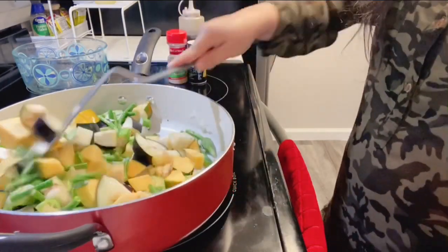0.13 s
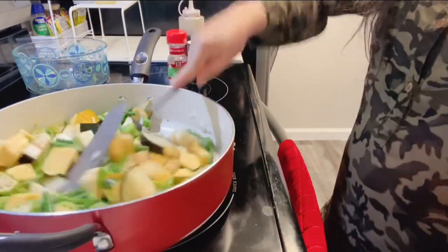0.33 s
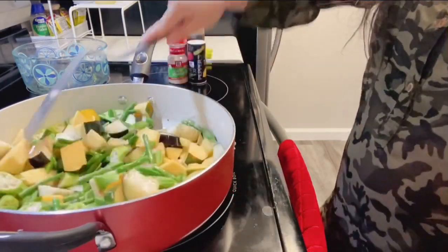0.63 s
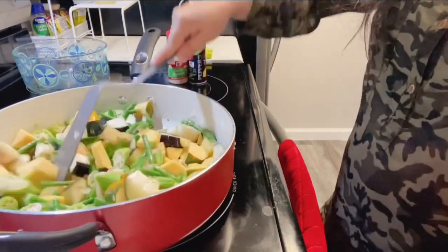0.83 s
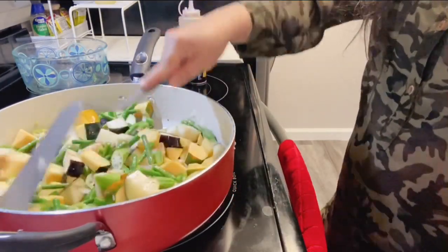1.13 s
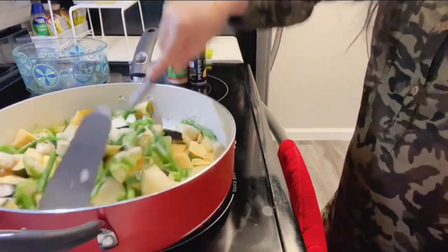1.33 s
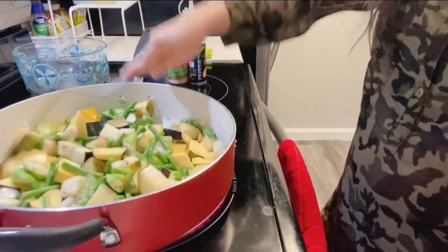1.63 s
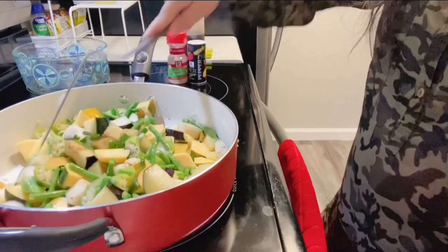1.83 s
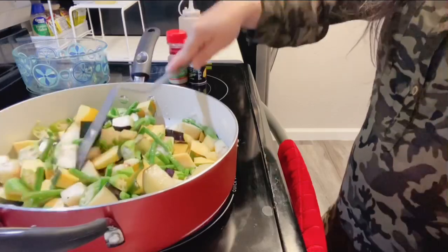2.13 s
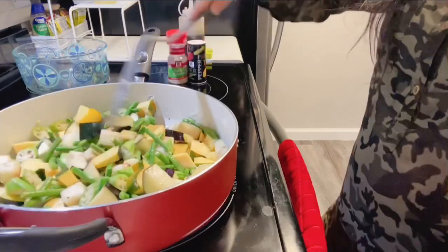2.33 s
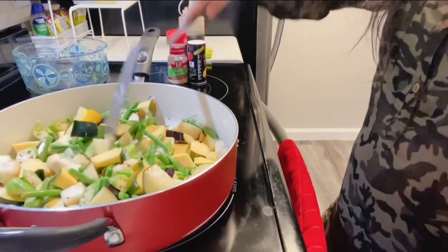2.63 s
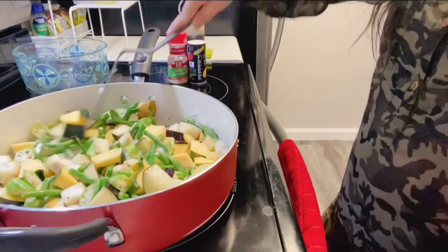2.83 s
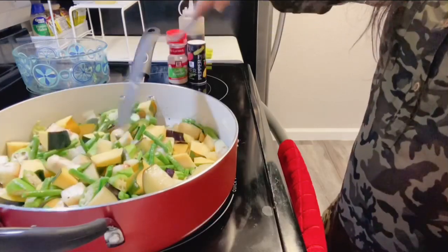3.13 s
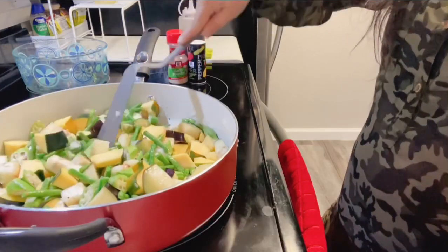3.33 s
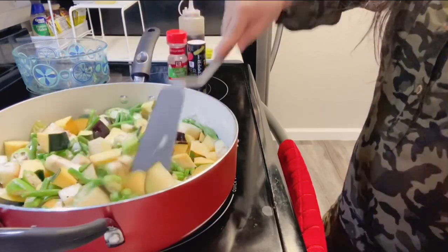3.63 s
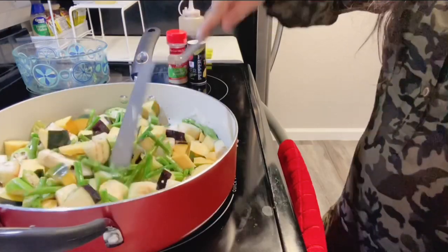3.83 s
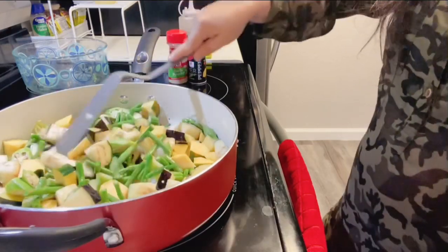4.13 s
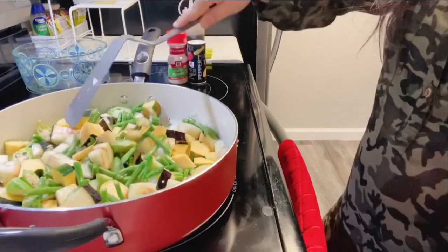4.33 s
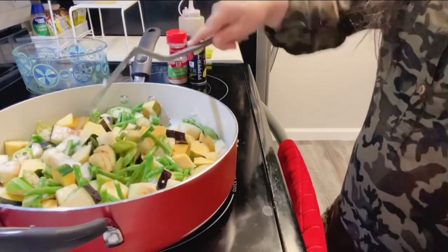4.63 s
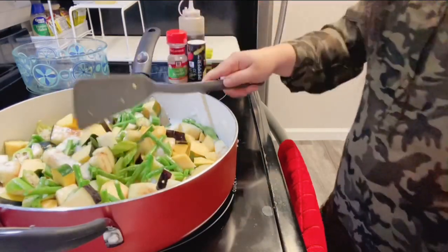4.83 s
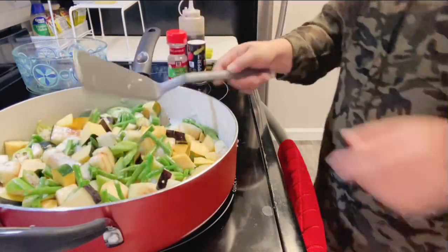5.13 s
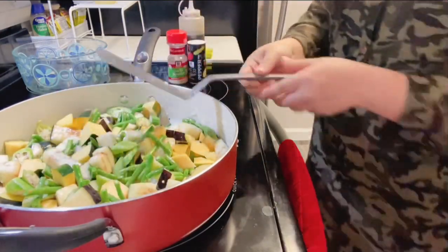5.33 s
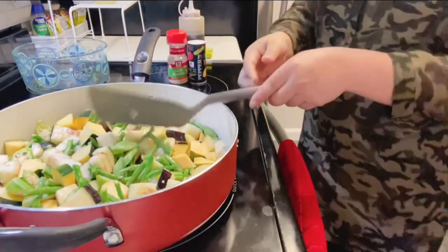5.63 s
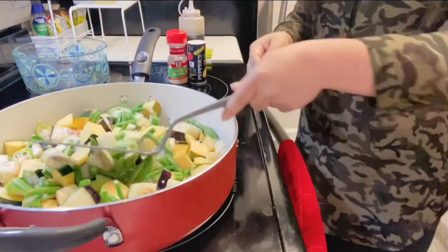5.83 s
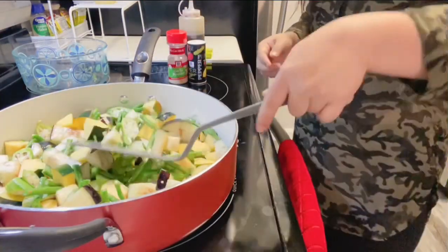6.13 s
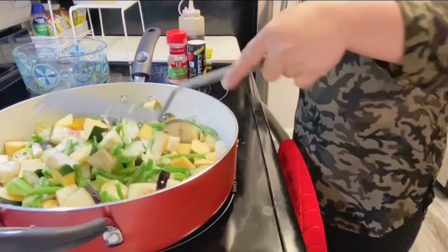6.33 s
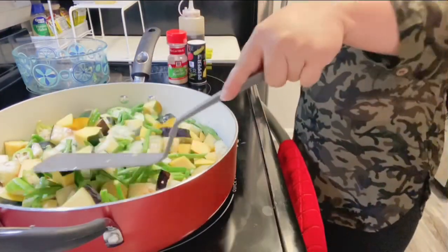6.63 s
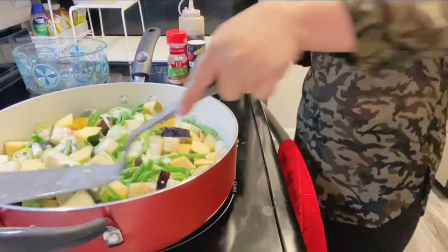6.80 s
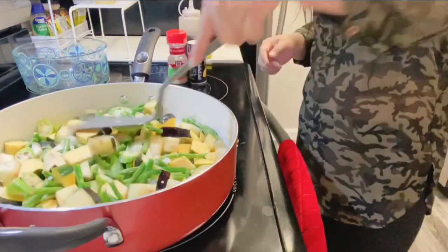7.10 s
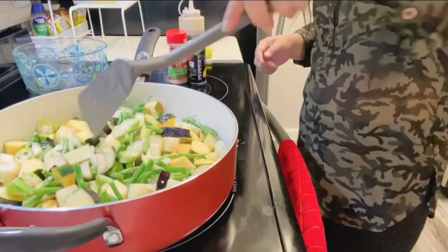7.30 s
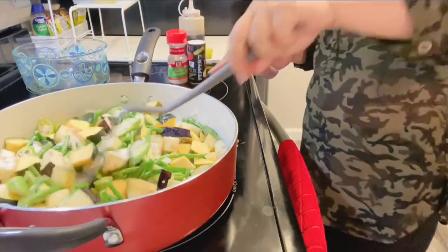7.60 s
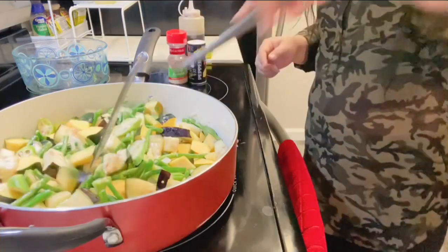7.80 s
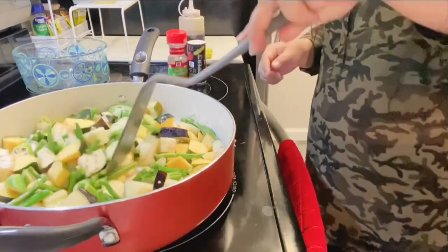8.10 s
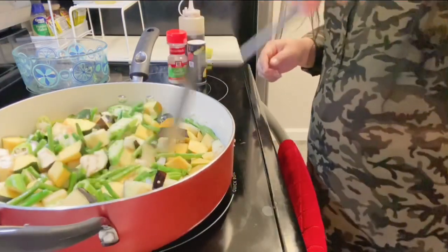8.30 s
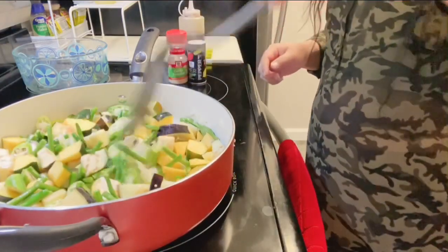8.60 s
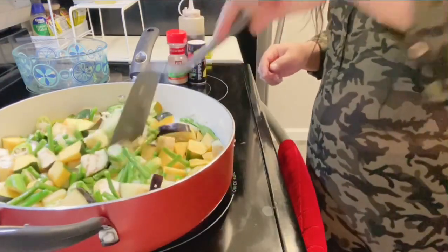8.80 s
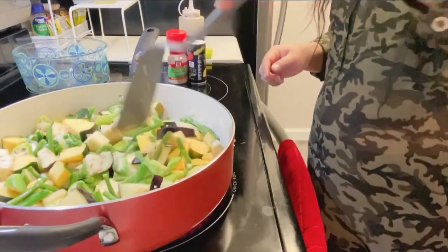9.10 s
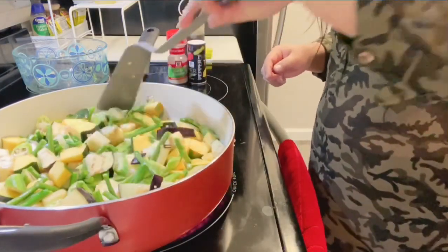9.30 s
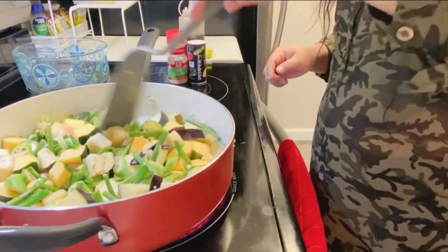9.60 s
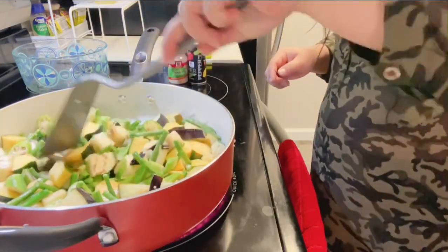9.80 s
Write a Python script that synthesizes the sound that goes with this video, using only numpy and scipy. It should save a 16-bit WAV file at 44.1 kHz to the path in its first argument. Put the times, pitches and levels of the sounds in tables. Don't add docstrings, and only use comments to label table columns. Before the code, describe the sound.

Throughout the ten seconds, oil sizzles with a dense, bright crackle and airy fizz over a low, wavering cooker-hood rumble, while vegetables turn with a soft muffled rustle. A brief hard scrape comes at 0.4 seconds, then knocks and a click around 0.8. Light drops and taps follow, with a duller knock at 1.7. A cluster of thuds and a sharp click lands at 2.8 to 3.0 seconds. A tap at 3.7 and a knock at 4.1 lead to two firm clacks with scrapes at 4.85 and 5.0, another click at 5.6, then a quieter stretch. Strong knocks return at 7.0, a long soft sweep at 7.3, and a crisp clack at 7.65. The sizzle lifts near 8.2; a hard scrape with taps comes at 8.5, food drops at 8.9, spits snap around 9.0 to 9.4, and a click sounds at 9.8. Close stereo, small kitchen, short echo.

```python
import sys
import numpy as np
from scipy import signal
from scipy.fft import rfft, irfft, next_fast_len
from scipy.io import wavfile

SR = 44100
rng = np.random.default_rng(int(sys.argv[2]) if len(sys.argv) > 2 else 0)


def nominal_scale(level):
    x = np.asarray(level, float) / 20
    return 10 ** x


def put_to_file(sound):
    columns = np.atleast_2d(sound).T
    safe = np.clip(columns, -1, 1)
    whole_steps = np.round(safe * 32767)
    wavfile.write(sys.argv[1], SR, whole_steps.astype(np.int16))


N = 438794


def rms_one(x):
    return x / np.sqrt(np.mean(x ** 2) + 1e-20)


def at_hz(points, hz):
    points = np.array(points)
    return np.interp(np.log(hz), np.log(points[:, 0]), points[:, 1])


def drift(rate_hz):
    r = np.exp(-80 * np.pi * rate_hz / SR)
    noise = rng.standard_normal(N // 40 + 2002)
    slow = signal.lfilter([1], [1, -2 * r, r * r], noise)[2000:]
    return np.interp(np.arange(N) / 40, np.arange(len(slow)), rms_one(slow))


def grains(per_s, spread_db, bed):
    size_db = spread_db * np.minimum(rng.exponential(1, (2, N)), 6)
    sizes = nominal_scale(size_db) * rng.choice([-1, 1], (2, N))
    clicks = sizes * (rng.random((2, N)) < per_s / SR)
    return rms_one(clicks) + bed * rng.standard_normal((2, N))


def coloured(source, spectrum, patchy_db, shared_db):
    size = next_fast_len(N)
    hz = np.maximum(np.fft.rfftfreq(size, 1 / SR), 1)
    shaped = rfft(source, size) * nominal_scale(at_hz(spectrum, hz))
    low_hz, high_hz = spectrum[0][0], spectrum[-1][0]
    step = 4 / 3 * np.log2(np.clip(hz, low_hz, high_hz) / low_hz)
    out = 0
    for k in range(int(step.max()) + 2):
        weight = np.maximum(1 - np.abs(step - k), 0)
        band = irfft(shaped * weight, size)[:, :N]
        out = out + nominal_scale(patchy_db * drift(20.7)) * band
    return rms_one(out * nominal_scale(shared_db * drift(12)))


# (time [s], oil vigour [dB], stirring effort [dB])
VIGOUR = [(0.0, -45, -46), (0.33, -41.5, -45), (0.55, -46.5, -49), (1.08, -47, -44.5), (1.3, -44, -45.5),
          (1.55, -47, -47.5), (2.22, -49, -45.5), (2.77, -45.5, -49), (4.13, -45, -46), (4.79, -46, -45.5),
          (5.04, -45.5, -43.5), (6.01, -44, -43.5), (6.2, -44, -44.5), (7.98, -45.5, -43),
          (8.23, -41.5, -48), (8.81, -43.5, -43.5), (9.15, -41.5, -43.5), (9.95, -42, -43.5)]


def vigour():
    s, *controls = np.transpose(VIGOUR)
    t = np.arange(N) / SR
    return [np.interp(t, s, c - c.mean()) for c in controls]


# (frequency [Hz], density [dB per Hz])
SIZZLE = [(1000, -4), (2200, 3), (3600, -2.5), (4500, 2.5), (6000, 3.5), (8000, -1), (9500, -4.5),
          (11000, -3), (16000, -63)]


def sizzle(oil_db):
    return nominal_scale(-43.5 + oil_db) * coloured(grains(4000, 3.4, 0.84), SIZZLE, patchy_db=2.3, shared_db=1.0)


# (frequency [Hz], density [dB per Hz])
FIZZ = [(4500, -89), (8000, 13.5), (10000, -12), (11500, 7), (13000, -9), (14500, 3.5), (16000, -3.5),
        (19000, 5)]


def fizz(oil_db):
    level_db = -49.5 + 1.1 * oil_db + 1.2 * drift(1.6)
    return nominal_scale(level_db) * coloured(grains(3700, 2.8, 1.8), FIZZ, patchy_db=2.5, shared_db=3.0)


# (middle [s], length [s], level change [dB])
SLIDES = [
    (0.36, 0.038, 5),
    (0.81, .05, 5),
    (3.02, .08, 3.5),
    (4.886, 0.081, 3),
    (5.058, 0.081, 2),
    (7.326, 0.31, -2.5),
    (7.997, 0.071, 0),
    (8.47, .09, 8.5),
    (9.4, .03, 4),
]


def slides_db():
    t = np.arange(N) / SR
    return sum(extra_db * np.exp(-(2 * (t - s) / length) ** 2) for s, length, extra_db in SLIDES)


# (frequency [Hz], density [dB per Hz])
SCRAPE = [(700, -55), (1300, -1), (1650, 0), (1800, 5.5), (2100, 1), (2800, 2), (3450, 2.5), (3900, -0.5),
          (7000, -17)]


def scrape(stir_db):
    level_db = -43.5 + stir_db + slides_db()
    return nominal_scale(level_db) * coloured(grains(2500, 3.2, 0.67), SCRAPE, patchy_db=2.0, shared_db=1.04)


# (frequency [Hz], density [dB per Hz])
TUMBLE = [(200, -18), (400, 1), (620, 9.5), (720, 5.5), (1100, 6), (1500, -5), (2500, -2)]


def tumble(stir_db):
    level_db = -43 + 0.36 * stir_db
    return nominal_scale(level_db) * coloured(grains(300, 2.53, 0.96), TUMBLE, patchy_db=2.5, shared_db=0.44)


def frying():
    oil_db, stir_db = vigour()
    return sizzle(oil_db) + fizz(oil_db) + scrape(stir_db) + tumble(stir_db)


# (frequency [Hz], density [dB per Hz])
HOOD = [(15, -36), (25, -39), (59, -9), (75, -4.5), (119, -6.5), (174, -6.5), (211, -10.5), (295, -4),
        (354, -1), (487, -5.5), (537, -11.5), (700, -18), (910, -68), (1540, -120)]
# (frequency [Hz], width [Hz], level [dB])
HOOD_TONES = [(63.6, 17.4, -44.5), (117.2, 5, -45.5), (172.5, 4.7, -45), (214, 26, -50), (242.3, 13, -50.5)]


def hood():
    hz = np.maximum(np.fft.rfftfreq(N, 1 / SR), 1)
    rumble = irfft(rfft(rng.standard_normal((2, N))) * nominal_scale(at_hz(HOOD, hz)), N)
    out = nominal_scale(-37.5 - 6.5) * rms_one(rumble)
    for tone_hz, width_hz, level_db in HOOD_TONES:
        r = np.exp(-np.pi * width_hz / SR)
        poles = [1, -2 * r * np.cos(2 * np.pi * tone_hz / SR), r * r]
        tone = signal.lfilter([1, 0, -1], poles, rng.standard_normal((2, N)))
        out = out + nominal_scale(level_db) * rms_one(tone)
    return out


def struck(modes, gains, t, phases):
    hz, level_db, t60 = np.transpose(modes)[:, :, None]
    envelope = gains[:, None] * nominal_scale(level_db - 60 * t / t60)
    return np.sum(envelope * np.sin(2 * np.pi * hz * t + phases[..., None]), -2)


def puff(noise, low_hz, high_hz, t, t60):
    band = signal.butter(3, [low_hz, high_hz], "band", fs=SR, output="sos")
    burst = signal.sosfilt(band, noise * nominal_scale(-60 * t / t60))
    return burst / np.abs(burst).max()


def pair_noise(count, apart):
    shared, left, right = rng.standard_normal((3, count))
    return shared + apart * np.array([left, right])


def add(out, sound, s):
    i = round(s * SR)
    out[:, i:i + sound.shape[1]] += sound[:, :N - i]


def snaps(events):
    out, t = np.zeros((2, N)), np.arange(SR // 16) / SR
    for s, peak_db, hz, snap_db, top_db in events:
        noise = pair_noise(len(t), apart=0.16)
        body = 0.52 * struck([(hz, 0, .012)], np.ones(1), t, np.zeros(1))
        body = body + 0.26 * puff(noise, 1010, 3800, t, 0.031)
        snap = nominal_scale(snap_db + 2.5) * puff(noise, 3800, 8970, t, 0.014)
        spray = nominal_scale(top_db + 10.5) * puff(noise, 9300, 2 * 9300, t, .009)
        add(out, nominal_scale(peak_db + 2.5) * (body + snap + spray), s)
    return out


# (time [s], peak [dB], pitch [Hz], sharpness [dB])
TICKS = [(0.045, -24.5, 2550, -9), (0.157, -26, 2530, -2), (0.8169, -17.5, 1950, -10.1),
         (1.696, -24.5, 2740, -6), (2.9654, -10.5, 3480, -6.5), (4.012, -21.5, 2150, -1.5),
         (4.003, -33, 2100, -4), (4.166, -30, 1900, -12), (3.627, -30, 1700, -11), (4.1828, -24, 3800, -5),
         (4.846, -11.5, 2950, -15), (5.0211, -17, 2750, -17), (9.389, -24, 2500, -5),
         (5.6306, -16.5, 2020, -13), (7.0319, -13, 1850, -8.5), (7.6506, -9.5, 3170, -5.5),
         (7.812, -24, 2960, -8), (8.2453, -25.5, 2400, 2.5), (8.4766, -21.5, 1900, -4),
         (9.6897, -21.5, 2840, 0), (9.8338, -12, 2260, -1)]


def ticks():
    return snaps([(*row, row[-1] - 16) for row in TICKS])


# (frequency [Hz], level [dB], T60 [s])
PAN = [(428, 0.5, 0.13), (516.6, 0.5, 0.12), (626, -2.5, 0.32), (872, 6.5, 0.049), (1016, -5.5, 0.19),
       (1178, -5, 0.31), (1330, -6.5, 0.11), (1730, 2.5, 0.1), (2120, -3, 0.081), (2820, 8.5, 0.044),
       (3270, 1.5, 0.05), (4220, -56, 0.027), (6070, 11, 0.048)]
# (frequency [Hz], level [dB], T60 [s])
COOKER = [(69.3, 0, 0.32), (128.7, 7.5, 0.085), (179, -1, 0.16), (240.5, 3, 0.097), (320, 0, 0.071)]


def impacts(contacts):
    out, t, pan_hz = np.zeros((2, N)), np.arange(SR // 5) / SR, np.array(PAN)[:, 0]
    for s, body_db, hz, clack_db, thump_db in contacts:
        edge_db = -8.5 + clack_db
        noise, draw = pair_noise(len(t), apart=1.3), rng.random((5, len(PAN)))
        hardness = [(620, 0), (950, .7 * clack_db), (1500, clack_db), (3400, edge_db), (6000, edge_db - 15)]
        gains = nominal_scale(at_hz(hardness, pan_hz) - 19.5 + 2.2 * draw[0])
        ring = struck(PAN, gains, t, 1.8 * draw[1] + 2.27 * draw[3:])
        ring *= nominal_scale(1.5 - 60 * t / .13)
        ring += struck([(hz, at_hz(hardness, hz) / 2 - 1.5, .033)], np.ones(1), t, np.zeros(1))
        onset = (1 - np.exp(-t * hz / 0.39)) ** 2
        shaken = 0.26 * puff(noise, 288, 710, t, 0.092)
        shaken = shaken + 0.4 * nominal_scale(clack_db) * puff(noise, 960, 1840, t, 0.043)
        crack = .7 * nominal_scale(clack_db) * puff(noise, 900, 2600, t, .014)
        crack = crack + .8 * nominal_scale(edge_db) * puff(noise, 2500, 4400, t, .018)
        thump = struck(COOKER, nominal_scale(3.4 * draw[2, :len(COOKER)]), t, np.zeros(len(COOKER)))
        thump *= 1 - np.exp(-t / .005)
        thump *= nominal_scale(thump_db) / np.abs(thump).max()
        add(out, nominal_scale(body_db + 6.0) * (ring * onset + shaken + crack + thump), s)
    return out


# (time [s], peak [dB], pitch [Hz])
DROPS = [(0.304, -32, 628), (0.893, -22.5, 403), (0.995, -27, 533), (1.034, -28, 535), (1.699, -19, 453),
         (2.837, -31, 554), (2.938, -28, 608), (5.304, -36, 457), (7.045, -19, 437), (7.174, -21.5, 495),
         (7.197, -41, 520), (8.033, -32, 430), (8.86, -18.5, 565), (8.879, -28, 457), (8.894, -22, 370),
         (9.04, -25.5, 500), (9.922, -29, 490)]


def drops():
    hardness_db, weight_db = -15.5, -17.5
    return impacts([(*row, hardness_db, weight_db) for row in DROPS])


# (time [s], peak [dB], pitch [Hz], hardness [dB])
TAPS = [(0.347, -34.5, 1880, 6), (0.369, -31, 405, 2), (0.458, -34, 604, 5), (0.748, -28, 1000, -9),
        (1.458, -51.5, 398, 17), (2.806, -39, 1010, -2), (3.211, -38, 353, -1), (3.711, -20.5, 2140, 2),
        (4.107, -33, 960, -3), (4.465, -29, 945, -2), (4.477, -37, 860, 2.1), (5.843, -42, 355, 7),
        (8.476, -17.5, 1340, -7), (8.484, -23.5, 1110, -4), (8.374, -40, 912, -1), (8.546, -24.5, 597, -3),
        (9.378, -30.5, 1930, -5)]


def taps():
    weight_db = -24
    return impacts([(*row, weight_db) for row in TAPS])


def kitchen(x):
    t = np.arange(SR // 2) / SR
    tail = rng.standard_normal((2, len(t))) * nominal_scale(-60 * t / .28) * (t > .003)
    tail = signal.sosfilt(signal.butter(1, [260, 5000], "band", fs=SR, output="sos"), tail)
    tail = tail / np.sqrt(np.sum(tail ** 2) / 2)
    return nominal_scale(-11) * signal.fftconvolve(x, tail, axes=1)[:, :N]


# (time [s], peak [dB], pitch [Hz], spray [dB])
SPITS = [(0.5724, -33, 2370, 0), (1.2186, -30, 2310, -20.1), (1.505, -29, 3450, -21),
         (3.2081, -28.5, 1500, -10), (3.2585, -26, 2030, -20.1), (3.7555, -26, 2540, -19),
         (5.923, -32, 2770, -18), (6.401, -35, 2040, 0.5), (7.9736, -30, 2120, -17),
         (7.9894, -26, 2200, -15), (8.288, -29, 2950, -20.1), (8.333, -27.5, 3330, -10),
         (9.13, -28.5, 3800, -3), (9.2134, -25, 2880, -10), (9.3202, -34, 2900, -18.5),
         (9.3766, -19, 2840, -12)]


def spits():
    snap_db = -8.5
    return snaps([(*row[:-1], snap_db, row[-1]) for row in SPITS])


# (time [s], peak [dB], pitch [Hz], hardness [dB], weight [dB])
BLOWS = [(0.729, -32, 935, 3, 0.1), (0.761, -19.5, 485, -11, -12), (1.199, -28, 423, -4.5, -14),
         (1.653, -25.5, 554, -31, -9), (2.852, -15.5, 590, -18, -10), (2.861, -18, 995, -15, -17),
         (2.89, -32, 498, -5, 1), (3.009, -30.5, 360, -8, -3), (3.307, -32.5, 460, -3, -4),
         (3.721, -41, 413, -6, 2), (4.138, -23, 503, -15, -8.5), (4.847, -15.5, 1140, -1, -4.5),
         (4.891, -27, 440, -1, -5), (5.021, -19.5, 1155, 1.5, -3), (5.048, -38, 1130, -5, 3),
         (5.632, -28, 1260, -5, -2), (6.493, -31.5, 346, -3, -4), (7.002, -20, 1000, -3.5, -15),
         (7.033, -15, 538, 1, -16), (7.054, -35, 430, -14, -4), (7.652, -21.5, 613, 7.5, -10.5)]


def blows():
    return impacts(BLOWS)


# (frequency [Hz], coherence [0-1])
LIKENESS = [(40, .98), (130, .85), (300, .68), (700, .45), (1500, .52), (3200, .42), (4600, .05),
            (6000, .36), (7200, .45), (8500, .72), (16000, .75)]


def ports(steady, direct):
    in_step_hz, half_turn_hz, spaced_from_hz = 6100, 2900, 4600
    size = next_fast_len(N)
    hz = np.maximum(np.fft.rfftfreq(size, 1 / SR), 1)
    turn = np.exp(-1j * np.pi * (hz - in_step_hz) / half_turn_hz * (hz > spaced_from_hz))
    alike = at_hz(LIKENESS, hz)
    left, other = rfft(steady, size) * (hz < 15850)
    near = rfft(direct, size)
    right = turn * (alike * left + near[1]) + np.sqrt(1 - alike ** 2) * other
    return irfft(np.array([left + near[0], right]) * nominal_scale([[.2], [-.2]]), size)[:, :N]


def scene():
    struck_sounds = ticks() + drops() + taps() + spits() + blows()
    return ports(frying() + hood(), struck_sounds) + kitchen(struck_sounds)


# (frequency [Hz], share [dB])
PAIR_DROP = [(7900, -30), (8600, -4.9), (9300, -4.3), (10000, -3.9), (10700, -4.5), (11400, -3.2),
             (12700, -3.1), (13400, -2.4), (14100, -3.1), (14800, -3), (15500, -3.9)]


def joint_stereo(x):
    frame, start, band_bins = 1024, 259, 32
    pair = np.pad([x[0] + x[1], x[0] - x[1]], ((0, 0), (frame - start, 0))) / 2
    hz, _, z = signal.stft(pair, SR, "cosine", 2 * frame, frame)
    starts = np.arange(0, len(hz), band_bins)
    power = np.add.reduceat(np.abs(z) ** 2, starts, axis=1) + 1e-20
    share = nominal_scale(2 * at_hz(PAIR_DROP, hz[starts] + hz[band_bins // 2]))[:, None]
    treble = power[:, hz[starts] > PAIR_DROP[0][0]].sum((0, 1))
    burst = treble > nominal_scale(7.5) * signal.medfilt(treble, 9)
    keep = np.repeat((power > share * power[::-1]) | burst, band_bins, axis=1)[:, :len(hz)]
    whole = signal.istft(z * keep, SR, "cosine", 2 * frame, frame)[1]
    mid, side = whole[:, frame - start:][:, :N]
    return np.array([mid + side, mid - side])


def top_cut(x):
    return signal.sosfilt(signal.butter(12, 16510, fs=SR, output="sos"), x)


def record(dry):
    low_pass = signal.cheby2(14, 60, 16600, fs=SR, output="sos")
    mix = joint_stereo(signal.sosfilt(low_pass, dry))
    return top_cut(mix)


dry = scene()
out = record(dry)
put_to_file(out)
```